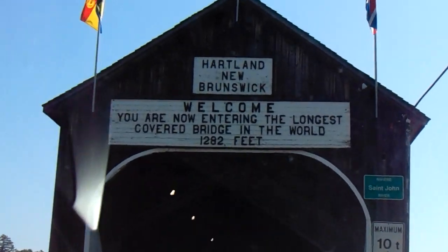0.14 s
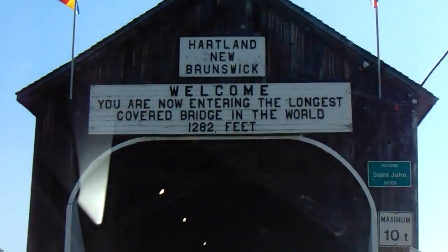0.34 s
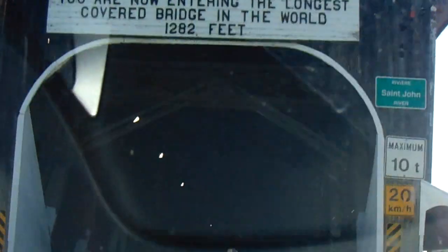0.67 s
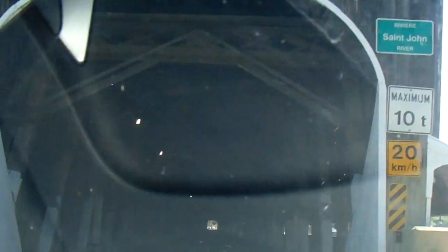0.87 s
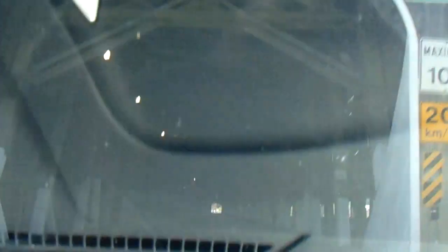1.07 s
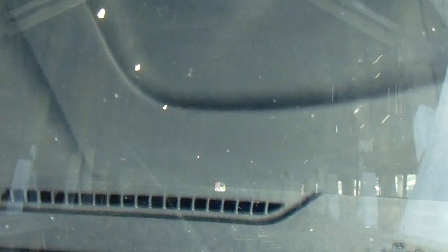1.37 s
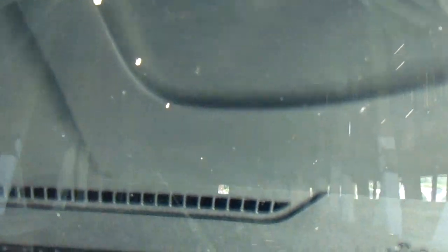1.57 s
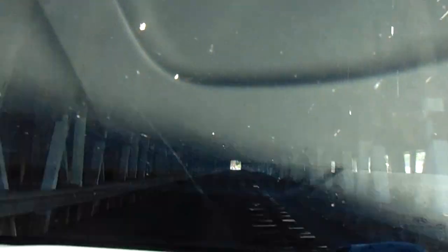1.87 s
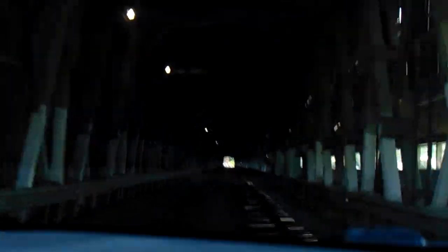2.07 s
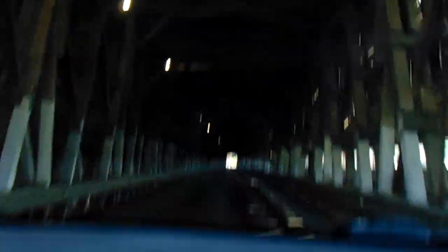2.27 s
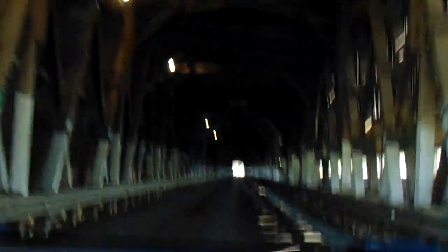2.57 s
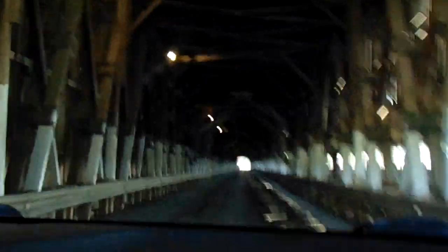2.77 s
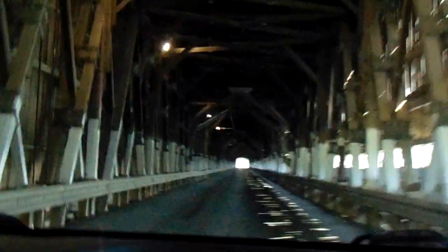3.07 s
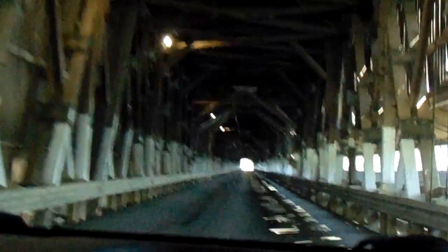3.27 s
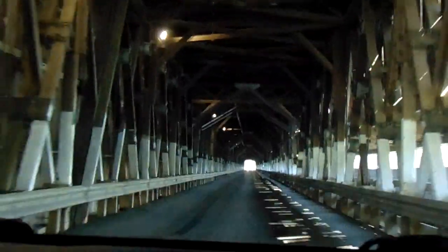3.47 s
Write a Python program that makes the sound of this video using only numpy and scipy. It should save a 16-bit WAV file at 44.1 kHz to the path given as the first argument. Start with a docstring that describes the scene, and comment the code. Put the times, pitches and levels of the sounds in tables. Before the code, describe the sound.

Slow car heard from inside: low drone, soft bumps, then a burst of thuds and rattling knocks

```python
"""Inside a slow car rolling onto a plank bridge: joints and planks jolt the wheels into booms, thuds and
hollow knocks, trim panels knock, loose parts chink and tick. Decaying sine modes and fading noise make these.
Beneath, road roughness shakes the body (a deep boom, a floor-pan hum, a drone), tyres roar and air hisses,
all as coloured noise with moving levels; a gear whines as a gliding sine."""
import sys
import numpy as np
from scipy import signal
from scipy.fft import rfft, irfft, next_fast_len
from scipy.io import wavfile
from scipy.ndimage import map_coordinates

SR = 44100
rng = np.random.default_rng(int(sys.argv[2]) if len(sys.argv) > 2 else 0)


def bounce(signal):
    """Save signal as a 16-bit WAV file at the path given by the first command-line argument."""
    frames = np.transpose(np.atleast_2d(signal))
    limited = np.clip(frames, -1, 1)
    pcm = np.round(limited * 32767).astype(np.int16)
    wavfile.write(sys.argv[1], SR, pcm)


N = 160083

# Resonances of the body and cabin: (frequency [Hz], width [Hz], relative level [dB])
BODY_MODES = [(151.8, 56, -6), (205.6, 27.7, 0.5), (282.2, 36, -5.5), (350.7, 27.4, -6.5),
              (428, 135, -14.5)]


def amp(db):
    """Decibel law: 20 dB is a factor of ten in amplitude."""
    return 10 ** (np.asarray(db) / 20)


def unit(x):
    """Normalisation to an rms of 1."""
    return x / np.sqrt(np.mean(x ** 2) + 1e-20)


def curves(rows):
    """Linear interpolation: one value per sample for each column after the time."""
    s, *cols = np.transpose(rows)
    return [np.interp(np.arange(N) / SR, s, c) for c in cols]


def wobble(rate):
    """Slow random fluctuation: a smooth curve through normal draws, rate knots a second."""
    knots = rng.standard_normal(int(N * rate / SR) + 4)
    return map_coordinates(knots, [np.arange(N) * rate / SR])


def filtered(x, response):
    """Linear filtering: the spectrum of x times a response of frequency."""
    m = next_fast_len(len(x) + 8192)  # zero padding
    return irfft(rfft(x, m) * response(np.fft.rfftfreq(m, 1 / SR)), m)[:len(x)]


def shape(points):
    """Spectral envelope: gain through (Hz, dB) points on a log-frequency axis."""
    f, v = np.transpose(points)
    return lambda hz: amp(np.interp(np.log(hz + 1), np.log(f + 1), v))


def peak(f, hz, wide_hz):
    """Damped resonator: unit response at hz, falling to either side."""
    return 1j * f * wide_hz / (hz * hz - f * f + 1j * f * wide_hz)


def peaks(rows):
    """Modal superposition: (Hz, width Hz, dB) resonances summed with alternating sign."""
    def response(f):
        return sum((-1) ** k * amp(db) * peak(f, hz, w) for k, (hz, w, db) in enumerate(rows))
    return response


def noise(response, size=N):
    """Random excitation: noise coloured by a response, at rms 1."""
    return unit(filtered(rng.standard_normal(size), response))


def fade(t60, rise_s):
    """Exponential damping: one second of time and of a soft rise and fall that peaks at 1."""
    t = np.arange(SR) / SR
    e = amp(-60 * t / max(t60, .01)) * (1 - np.exp(-t / rise_s))
    return t, e / e.max()


def add(out, s, x):
    """Linear superposition: mix x in at s seconds."""
    i = round(s * SR)
    out[i:i + len(x)] += x[:N - i]


def booms():
    """Impulse excitation: each wheel jolt rings the shell's low mode, with a dull slap of noise."""
    # Jolts that boom: (time [s], tone peak [dB], decay by 60 dB [s])
    boom_events = [(0.16, -22, 0.66), (0.613, -16, 0.43), (1.044, -13.5, 0.43), (2.022, -15, 0.54),
                   (2.216, -13, 0.35), (2.279, -13, 0.15), (2.388, -13.5, 1), (2.534, -10.5, 0.32),
                   (2.686, -7.5, 0.64), (2.894, -9, 0.54), (3.149, -25.5, 0.42)]
    boom_hz, rise_s = 27.7, 0.0047
    slap_hz, slap_db, slap_t60 = 78, -8, 0.2  # level relative to the tone
    out = np.zeros(N)
    for s, db, t60 in boom_events:
        t, e = fade(t60, rise_s)
        tone = e * np.sin(2 * np.pi * boom_hz * t)
        slap = fade(slap_t60, rise_s)[1] * noise(lambda f: peak(f, slap_hz, slap_hz) ** 2, size=SR)
        add(out, s, amp(db) * (tone + amp(slap_db) * slap))
    return out


def thuds():
    """Modal excitation: a jolt rings the floor pan and, more weakly, the neighbouring body modes."""
    # Jolts that thud: (time [s], floor-pan tone peak [dB])
    thud_events = [(0.146, -22.5), (.28, -21.5), (0.586, -16.5), (1.025, -22), (1.088, -20), (2.108, -20),
                   (2.16, -15), (2.285, -13), (2.33, -15.5), (2.42, -8), (2.471, -11), (2.507, -13),
                   (2.77, -14), (2.87, -19)]
    pan_hz, body_db = 117.7, -17.5
    t, e = fade(0.2, 0.003)
    out = np.zeros(N)
    for s, db in thud_events:
        side = sum(amp(level) * np.sin(2 * np.pi * (hz * t + rng.random())) for hz, w, level in BODY_MODES)
        hz = pan_hz * (1 + 0.031 * rng.normal())  # each thud differs a little in pitch
        add(out, s, amp(db) * e * (np.sin(2 * np.pi * hz * t) + amp(body_db) * side))
    return out


def planks():
    """Resonant response: loose planks answer the wheels with a soft tone in a puff of tuned noise."""
    # Hollow knocks: (time [s], tone peak level [dB], pitch [Hz])
    plank_events = [(2.12, -26.5, 320.5), (2.15, -26.5, 454.6), (2.165, -24.5, 228), (2.4, -20, 283.3),
                    (2.48, -18.5, 198)]
    q = 5.2  # pitch over bandwidth of the puff
    t, e = fade(0.23, 0.0024)
    out = np.zeros(N)
    for s, db, hz in plank_events:
        puff = noise(lambda f: peak(f, hz, hz / q), size=SR)
        add(out, s, amp(db) * e * (np.sin(2 * np.pi * hz * t) + 0.49 * puff))
    return out


def knocks():
    """Broadband impact: a trim panel's knock is a brief crack, a longer noise burst and ringing modes."""
    # Blows on the trim: (time [s], overall gain [dB], brightness tilt [dB per octave])
    knock_events = [(2.233, -21.5, -2.5), (2.436, -18, -0.5), (2.484, -18.5, 1), (2.532, -9.5, 1),
                    (2.611, -17, 0), (2.643, -19, 1.5), (2.68, -20.5, -0.5), (2.864, -25.5, 4.5),
                    (2.884, -20, 5), (2.945, -23.5, 4.5), (3.017, -19, -1)]
    # Spectral envelope of the burst: (frequency [Hz], relative level [dB])
    burst_colour = [(250, -13), (550, 3.5), (800, -1.5), (1700, -11), (3500, -18.5), (5000, -22.5),
                    (14000, -45)]
    burst_db, crack_db, ring_db = -9, 2, -13.5  # the crack is relative to the burst
    burst_fade, crack_fade = fade(.14, 0.003)[1], fade(0.011, 0.00019)[1]
    e = burst_fade + amp(crack_db) * crack_fade
    out = np.zeros(N)
    for s, db, tilt in knock_events:
        colour = lambda f: shape(burst_colour)(f) * amp(tilt * np.log2(f / 600 + 0.15))
        burst = e * noise(colour, size=SR)
        add(out, s, amp(db) * (amp(burst_db) * burst + amp(ring_db) * ring(tilt)))
    return out


def ring(tilt):
    """Modal ringing: one blow on the trim excites each mode to a new random level."""
    # Trim modes: (frequency [Hz], mean level before tilt [dB])
    trim_modes = [(533, 1.5), (850, -5), (1233, -3), (1690, -2), (2100, -8), (3000, -12.5)]
    scatter_db = 2.5  # standard deviation
    t, e = fade(.075, 0.00068)
    out = np.zeros(SR)
    for hz, db in trim_modes:
        mode_db = db + tilt * np.log2(hz / 600) + scatter_db * rng.normal()
        out += amp(mode_db) * np.sin(2 * np.pi * hz * t)
    return e * out


def chinks():
    """Amplitude-modulated modes: a loose metal part buzzes as the level of each mode flutters."""
    # Chinks: (time [s], overall gain [dB], further gain of the modes above the lowest [dB])
    chink_events = [(1.168, -30, -16), (2.644, -24, -4.5), (2.771, -28.5, -1), (2.865, -29, 1),
                    (2.88, -28, 4.5), (2.946, -23, -7), (3.019, -28.5, -5)]
    # Metal modes, lowest first: (frequency [Hz], mean level [dB])
    metal_modes = [(850, -4.5), (1325, -1.5), (3800, -16), (4980, -15.5)]
    buzz_db = 2.5  # scale of the flutter
    t, e = fade(.12, 0.0018)
    out = np.zeros(N)
    for s, db, upper_db in chink_events:
        modes = []
        for hz, level in metal_modes:
            flutter = amp(level + buzz_db * wobble(90)[:SR])
            modes.append(flutter * np.sin(2 * np.pi * hz * (1 + 0.015 * rng.normal()) * t))
        add(out, s, amp(db) * e * (modes[0] + amp(upper_db) * sum(modes[1:])))
    return out


def ticks():
    """Short impacts: loose small parts near the microphone give noise ticks, a ringing pip and a sharp click."""
    # Noise ticks: (time [s], level [dB], brightness tilt [dB per octave])
    tick_events = [(1.175, -39, 1), (2.379, -30.5, 0), (2.4145, -31.5, 0), (2.451, -33.5, -1),
                   (2.5305, -26.5, -7.5), (2.648, -29.5, 3), (2.687, -28, 13), (2.8804, -26, 15),
                   (2.9625, -31.5, -3), (3.077, -37.5, -3.5), (3.2224, -36, -7.5), (3.615, -38.5, -2.5)]
    # Spectral envelope of a tick: (frequency [Hz], relative level [dB])
    tick_colour = [(1200, -12), (3000, 6), (7000, -0.5), (9700, 2.5), (11500, 4), (14200, -1)]
    # Resonances of the click: (frequency [Hz], width [Hz], relative level [dB])
    plastic_modes = [(2040, 500, -1.5), (8100, 2500, -4), (9900, 480, 7), (13900, 1800, 3)]
    tick_t60 = 0.1  # seconds, the pip's too
    pip_s, pip_db, pip_hz = .76, -39, 1770
    snap_s, snap_db, snap_t60 = 3.5255, -20, 0.03  # one close click
    out = np.zeros(N)
    for s, db, tilt in tick_events:
        colour = lambda f: shape(tick_colour)(f) * amp(tilt * np.log2(f / 7000 + 0.039))
        add(out, s, amp(db) * fade(tick_t60, 0.00028)[1] * noise(colour, size=SR))
    t, e = fade(tick_t60, 0.0018)
    add(out, pip_s, amp(pip_db) * e * np.sin(2 * np.pi * pip_hz * t))
    add(out, snap_s, amp(snap_db) * fade(snap_t60, 0.0011)[1] * noise(peaks(plastic_modes), size=SR))
    return out


def body():
    """Forced vibration: road roughness shakes the shell, the floor pan and the cabin's drone resonances."""
    # Roughness heard: (time [s], boom level [dB], floor-pan hum level [dB], body drone level [dB])
    roughness = [(0, -29.5, -31, -33), (1.3, -26.5, -32, -35), (1.85, -28.5, -31, -35.5),
                 (2.15, -21.5, -31.5, -32.5), (2.9, -19.5, -26.5, -30.5), (3.25, -30.5, -34, -35.5),
                 (3.63, -31.5, -32, -36.5)]
    # Spectral envelope of the shell's boom: (frequency [Hz], relative level [dB])
    shell_colour = [(12, -27), (22, -1), (34, -1), (50, -9), (100, -15.5), (140, -26.5), (200, -74)]
    pan_hz, pan_wide_hz = 124.25, 21.7
    evenness = 0.48  # of the hum: exponent dividing out the noise's random swells
    boom_db, hum_db, drone_db = curves(roughness)
    hum = noise(lambda f: peak(f, pan_hz, pan_wide_hz) ** 2)
    envelope = np.abs(signal.hilbert(hum))
    hum = unit(hum / envelope ** np.clip(evenness, 0, 1))
    boom = noise(shape(shell_colour))
    drone = noise(peaks(BODY_MODES))
    return amp(boom_db) * boom + amp(hum_db) * hum + amp(drone_db) * drone


def road():
    """Broadband friction and flow noise: tyre roar, brighter when louder, and air hiss waver together."""
    # Course of the noise: (time [s], tyre roar level before the treble gain [dB], hiss level [dB])
    roar_course = [(0, -42, -49), (.85, -40.5, -45.5), (.95, -36.5, -44.5), (1.9, -36.5, -44),
                   (2.35, -34, -42), (2.65, -35, -43.5), (3, -34, -46), (3.2, -39, -47.5),
                   (3.63, -37.5, -47)]
    # Spectral envelope of the tyres: (frequency [Hz], relative level [dB])
    tyre_colour = [(250, -23), (400, -1.5), (600, -4), (900, 1.5), (1350, -6.5), (2100, -9), (2700, -12.5),
                   (3800, -19), (14000, -35)]
    # Spectral envelope of the hiss: (frequency [Hz], relative level [dB])
    air_colour = [(800, -41), (2500, 1.5), (6000, 0), (11000, 2), (14200, -0.5)]
    brightens, edge_hz = 0.95, 3500  # treble dB gained per dB of roar, above this edge
    roar_db, hiss_db = curves(roar_course)
    shake, roar = wobble(12), noise(shape(tyre_colour))
    treble = filtered(roar, lambda f: f ** 2 / (f ** 2 + edge_hz ** 2))
    flicker_db = 3.4 * wobble(60) + 1.3 * wobble(7.25)
    treble_db = brightens * (roar_db - roar_db.mean()) + flicker_db
    roar = roar + (amp(treble_db) - 1) * treble
    hiss = noise(shape(air_colour))
    return amp(roar_db + 0.67 * shake) * roar + amp(hiss_db + 1.37 * shake) * hiss


def whine():
    """Frequency modulation: a gear tone glides and wavers, its phase the running sum of its pitch."""
    # Gear tone: (time [s], mean pitch [Hz], mean level [dB])
    whine_course = [(0, 460, -43), (.76, 489.5, -46.5), (2, 480.3, -44.5), (2.15, 484.4, -68),
                    (3.63, 447, -46.5)]
    waver_hz = 2.5  # scale of the random pitch waver
    hz, db = curves(whine_course)
    phase = 2 * np.pi * np.cumsum(hz + waver_hz * wobble(16)) / SR
    return amp(db + 0.66 * wobble(10.15)) * np.sqrt(2) * np.sin(phase)


def scene():
    """Linear superposition of all the sources."""
    jolts = booms() + thuds() + planks()
    loose_parts = knocks() + chinks() + ticks()
    return (jolts + loose_parts + body() + road() + whine())[None]


def record(dry):
    """Band limiting: a ramp up to 10 Hz, and a steep fall about the top of the band."""
    top_hz = 14200

    def band(hz):
        return np.clip(hz / 10, 0, 1) * np.clip((top_hz + 100 - hz) / 150, 0, 1) ** 3
    return filtered(dry[0], band)[None]


dry = scene()
out = record(dry)
bounce(out)
```